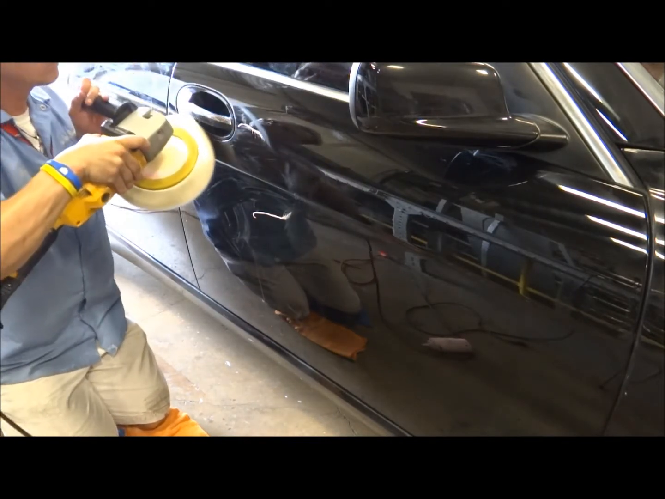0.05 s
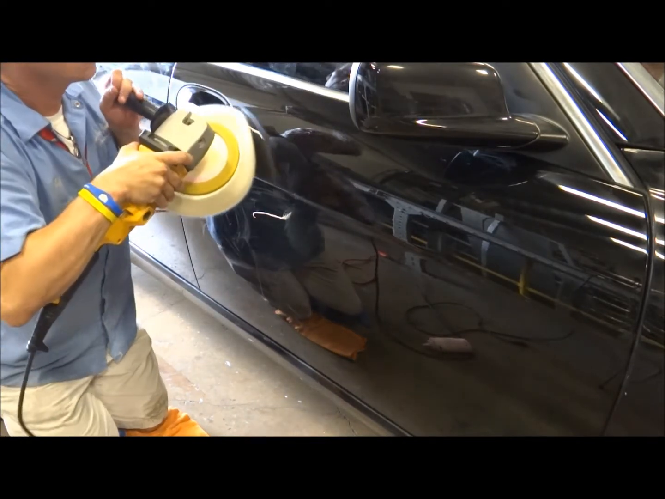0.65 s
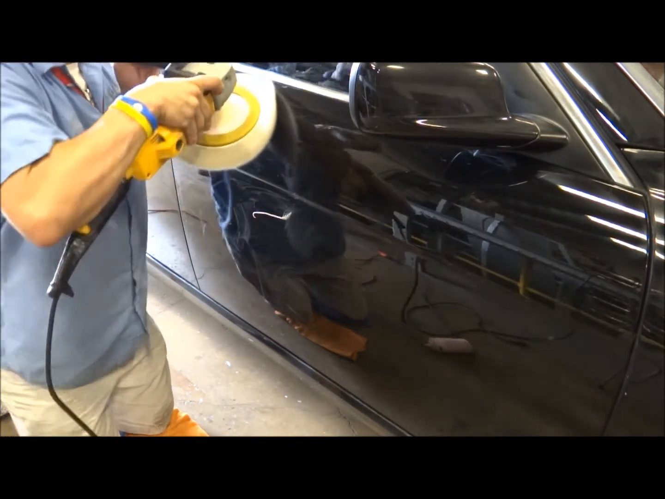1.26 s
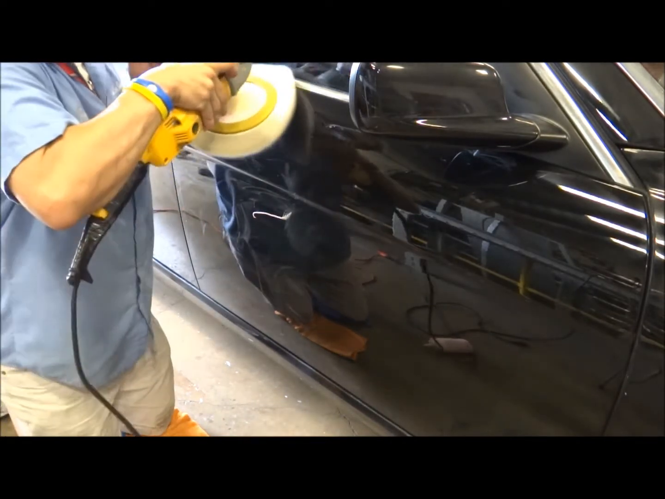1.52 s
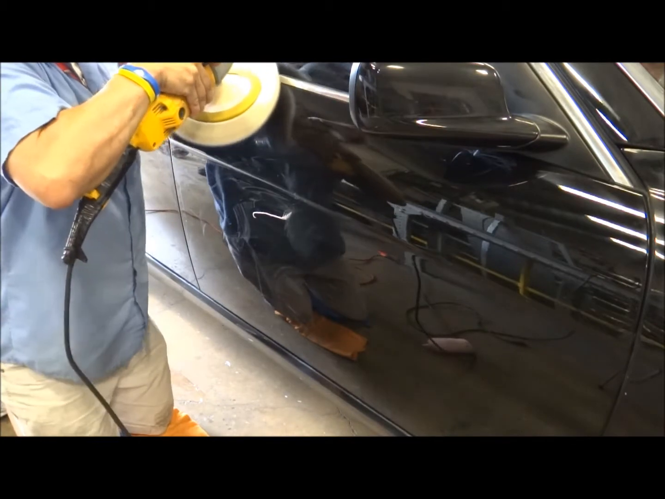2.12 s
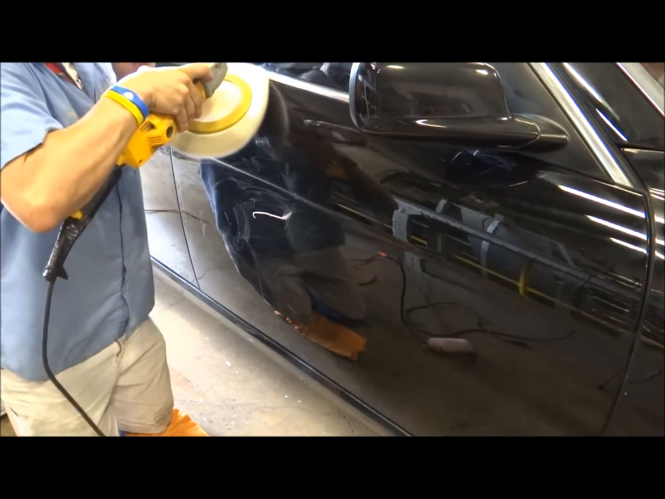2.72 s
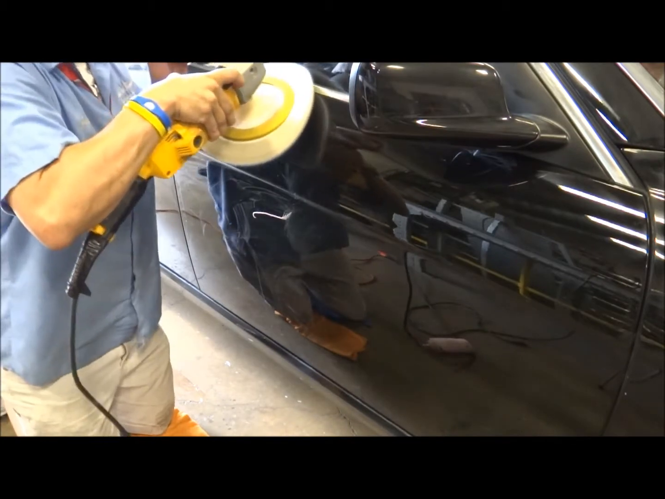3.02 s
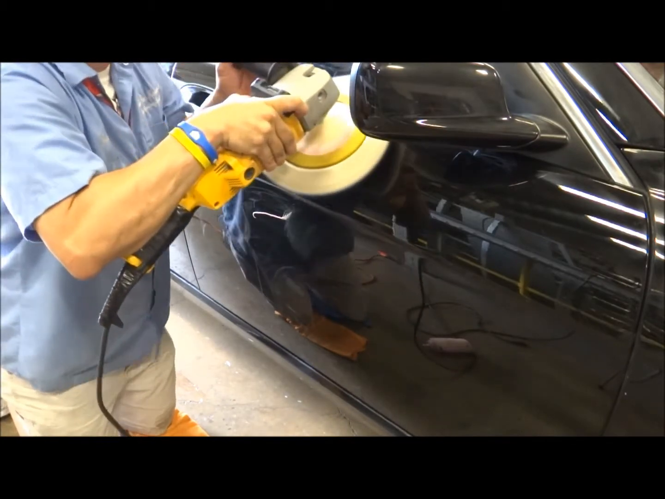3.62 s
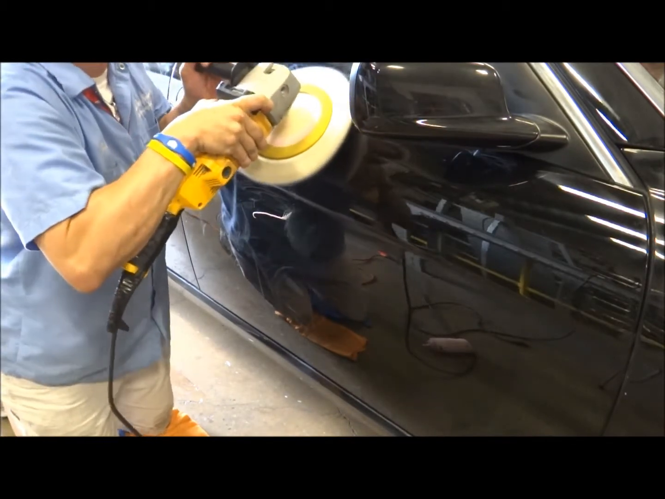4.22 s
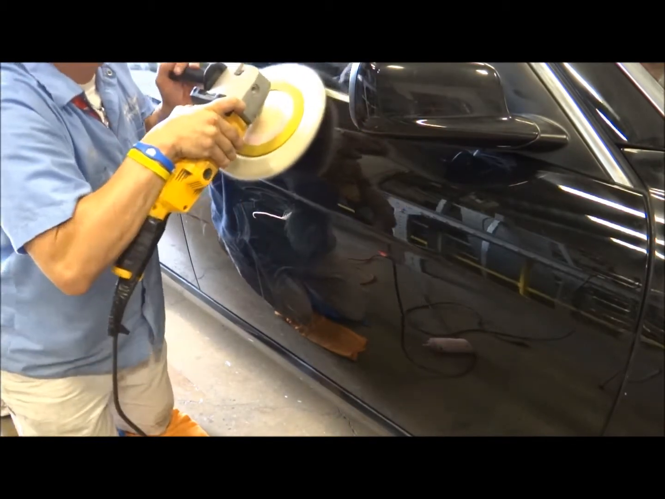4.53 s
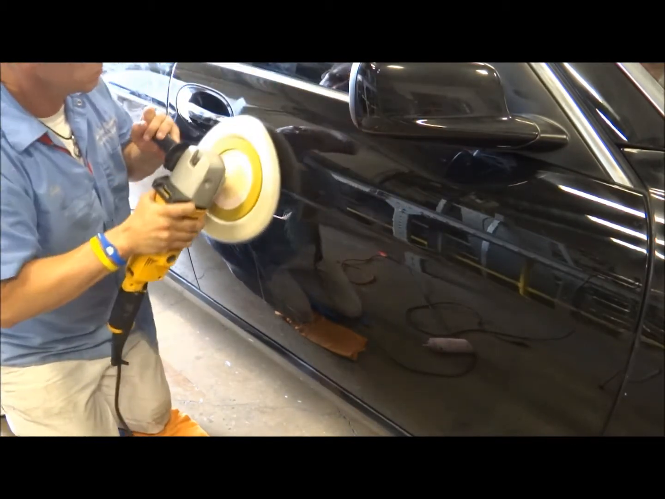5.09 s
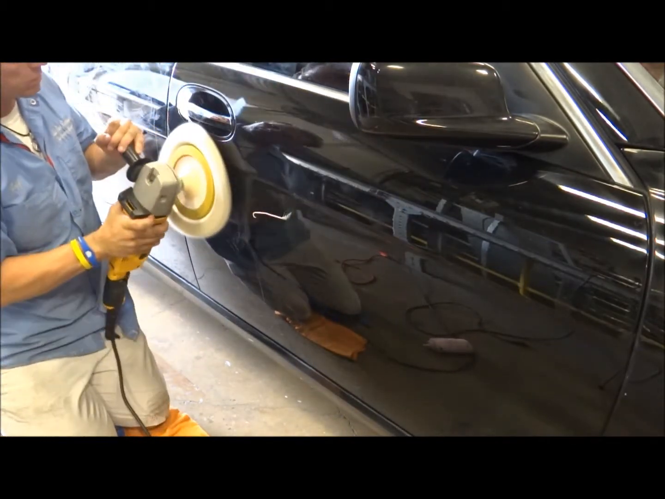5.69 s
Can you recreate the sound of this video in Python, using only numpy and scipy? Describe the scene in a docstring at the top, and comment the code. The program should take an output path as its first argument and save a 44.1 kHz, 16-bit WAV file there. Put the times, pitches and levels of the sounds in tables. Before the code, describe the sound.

A power polisher buffs car paint with a continuous high motor whine, a throbbing gear growl and airy hiss.

```python
"""An electric rotary polisher buffs a car door in a workshop, sagging and recovering as it is pressed on.
The motor whines on high multiples of its rotor speed; the gearbox growls below it and throbs with each
turn of the pad. Cooling air hisses from the vents, the pad rubs and rasps on the paint and sets the
door booming, and the workshop hums faintly behind."""
import sys
import numpy as np
from scipy import signal
from scipy.fft import rfft, irfft
from scipy.io import wavfile
from scipy.ndimage import uniform_filter1d

SR = 44100
rng = np.random.default_rng(int(sys.argv[2]) if len(sys.argv) > 2 else 0)


def store_pcm(level_fs):
    """Save levels as 16-bit WAV."""
    pcm = np.round(np.clip(level_fs, -1, 1) * 32767).astype(np.int16)
    wavfile.write(sys.argv[1], SR, np.atleast_2d(pcm).T)


N = 262395
TIME = np.arange(N) / SR
GEAR_RATIO = 9.11   # rotor turns per turn of the pad


def from_db(db):
    """Decibels to gain."""
    return 10 ** (np.asarray(db) / 20)


def rms_one(x):
    """Scale to unit rms."""
    return x / np.sqrt(np.mean(x ** 2) + 1e-20)


def in_time(points):
    """A curve through (seconds, value) points, at every sample."""
    return np.interp(TIME, *np.transpose(points))


def at_hz(points, hz):
    """Read a curve on a log-frequency axis."""
    f, value = np.transpose(points)
    return np.interp(np.log(np.maximum(hz, 1)), np.log(f), value)


def spell(start, end, edge_s):
    """A gate with soft edges: 1 between two times, 0 outside."""
    return np.clip(np.minimum(TIME - start, end - TIME) / edge_s + .5, 0, 1)


def spells(rows, edge_s):
    """A gain envelope from (start, end, dB) rows."""
    return sum(from_db(db) * spell(start, end, edge_s) for start, end, db in rows)


def drift(rate_hz):
    """Smooth random wander of rms 1."""
    step, settle = 40, 2000
    pole = np.exp(-2 * np.pi * rate_hz * step / SR)
    white = rng.standard_normal(N // step + settle + 2)
    slow = signal.lfilter([1], [1, -2 * pole, pole * pole], white)[settle:]
    return np.interp(np.arange(N) / step, np.arange(len(slow)), rms_one(slow))


def cycle(turns):
    """A sine wave on a count of turns, at a random phase."""
    return np.sin(2 * np.pi * (turns + rng.random()))


def noise(colour):
    """Coloured noise in a narrow stereo image; rms 1."""
    # Stereo width. Each row: frequency in Hz, left-right correlation.
    likeness = [(100, 0.99), (400, 1), (1000, 0.95), (2500, .97), (8000, 0.96), (12000, .999)]
    hz = np.arange(N // 2 + 1) * SR / N
    alike = np.clip(at_hz(likeness, hz), 0, 1)
    mid, side = rfft(rng.standard_normal((2, N))) * from_db(at_hz(colour, hz))
    return rms_one(irfft(np.sqrt(1 + alike) * mid + np.sqrt(1 - alike) * side * [[1], [-1]], N))


def partial(turns, order, fade_db, throb, rough, spread=0.035):
    """One multiple of the rotor speed, shaken by each turn of the pad and by tooth play; rms 1."""
    pad = turns / GEAR_RATIO
    level = from_db(fade_db * drift(5.9)) * (1 + throb * cycle(pad) + rough * drift(33))
    wobble = throb * cycle(pad) + rough * drift(45)
    phase = 2 * np.pi * (order * turns + rng.random()) + wobble
    # reflections off the door differ a little between left and right
    side = spread * drift(2.7) * np.cos(phase + 2 * np.pi * rng.random())
    return rms_one(level * (np.sin(phase) + side * [[1], [-1]]))


def swelling(order):
    """Gain of one partial, which swells while the tool is held at an angle that favours it."""
    # Each row: start and end in seconds, multiple of rotor speed, lift in dB.
    lifts = [(0, 0.505, 24, 2.5), (.5, .8, 50, 11), (1.08, 1.32, 50, 8), (1.102, 1.276, 25, 4),
             (1.15, 3.1, 4, 7.5), (1.35, 1.7, 36, 4), (1.717, 1.957, 24, 5), (1.85, 2.75, 28, 4),
             (2.15, 4.3, 9, 5), (2.25, 2.6, 50, 9), (2.71, 2.984, 23, 10.5), (2.894, 5.05, 30, 5),
             (3.3, 4.4, 49, 8.5), (3.455, 3.85, 6, 4.5), (4.35, 5.003, 24, 6), (4.35, 4.8, 25, 5.5),
             (4.65, 5.285, 6, 6.5), (5.1, 5.5, 36, 7)]
    return from_db(sum(db * spell(start, end, edge_s=0.11) for start, end, k, db in lifts if k == order))


def workshop_hum(rest_db=-81):
    """A bed of low tones that waver and swell."""
    # The tones. Each row: pitch in Hz, relative level in dB.
    hum_tones = [(59, -19), (91.5, -2.5), (118.4, -3.5), (360.7, -6)]
    # Their swells. Each row: start and end in seconds, level in dB.
    hum_swells = [(-.1, .95, -75), (2.45, 3.1, -82), (5.0, 5.85, -74)]
    bed = sum(from_db(db) * rms_one(from_db(2.5 * drift(3.4)) * cycle(hz * TIME + 0.12 * drift(4)))
              for hz, db in hum_tones)
    return (from_db(rest_db) + spells(hum_swells, edge_s=0.12)) * bed


def door_panel(pressure_db, boom_db=-4.0, drum_db=-73.5):
    """The door drums under the pad, and booms at a pitch set by where it is pressed."""
    # The booms. Each row: start and end in seconds, pitch in Hz, relative level in dB.
    panel_booms = [(.04, .22, 198, -61), (.63, 0.803, 195, -62.5), (.78, 1.05, 298, -65),
                   (1.046, 1.75, 185, -71.5), (1.95, 2.08, 198, -66), (2.43, 2.57, 190, -63),
                   (2.553, 2.92, 364, -65), (2.88, 3.15, 230, -60.5), (3.2, 3.6, 210, -66.5),
                   (3.856, 4.3, 203, -64), (5.732, 5.95, 196, -63.5)]
    # The steady drumming. Each row: frequency in Hz, relative level in dB.
    drum_colour = [(100, -31), (165, -11.5), (195, 3.5), (225, -7), (260, -3.5), (400, -36)]
    booms = 0
    for start, end, hz, db in panel_booms:
        tone = rms_one((1 + 0.38 * drift(11)) * cycle(hz * TIME + 0.12 * drift(10)))
        booms += from_db(boom_db + db) * spell(start, end, edge_s=0.12) * tone
    return booms + from_db(drum_db + pressure_db) * noise(drum_colour)


def pad_rub(turns, pressure_db, rub_db=-51.0):
    """The pad rubs unevenly round each turn, and scuffs on its rim when tilted."""
    # Colours of the rub and the scuff. Each row: frequency in Hz, relative level in dB.
    rub_colour = [(20, -21), (55, -10.5), (110, -11), (170, -6), (300, -4.5), (470, -2.5), (660, 1.5),
                  (1000, 1), (1450, 0), (2200, 4), (2800, 0), (3200, 1.5), (4200, -7.5), (7000, -14)]
    scuff_colour = [(200, -29), (380, -0.5), (700, 0), (1000, -11), (1400, -6), (2200, -20)]
    # The rim scuffs. Each row: start and end in seconds, level in dB.
    rim_scuffs = [(4.98, 5.72, -61.5)]
    pad = turns / GEAR_RATIO
    uneven = 1 + 0.1 * cycle(pad) + 0.13 * cycle(2 * pad)
    face = noise(rub_colour) * from_db(rub_db + pressure_db)
    rim = noise(scuff_colour) * spells(rim_scuffs, edge_s=0.11)
    return (face + rim) * uneven * from_db(0.75 * drift(10))


def pad_rasp(turns, grab, rasp_db=2.0):
    """A grabbing pad rasps brightly once a turn."""
    # Colour of the rasp. Each row: frequency in Hz, relative level in dB.
    rasp_colour = [(3500, -40), (5200, -4.5), (5900, 0), (6500, 5), (7300, -3), (8700, 0.5), (11000, -28)]
    pulses = rms_one(np.exp(.7 * cycle(turns / GEAR_RATIO) + 0.31 * drift(31)))
    return from_db(rasp_db) * grab * pulses * noise(rasp_colour)


def vent_air(turns, pressure_db, vent_db=-47.0, chop=0.16):
    """Cooling air hisses from the vents, chopped by the fan and louder under pressure."""
    # Colour of the hiss. Each row: frequency in Hz, relative level in dB.
    vent_colour = [(30, -55), (1500, -17.5), (4200, -11), (5800, -6.5), (6700, -1.5), (7500, -1), (8400, 1),
                   (9300, -2), (10200, -4.5), (11200, -13.5), (12500, -21), (13700, -21), (15500, -25)]
    air = noise(vent_colour) * (1 + chop * cycle(turns))
    return air * from_db(vent_db + 0.78 * pressure_db + 1.2 * drift(9.9))


def gearbox(turns, load_db, growl_db=-63.2, drone_db=-61.5, housing_db=-62):
    """Loaded gears growl and drone, the higher partials throbbing more; the housing rings each pad turn."""
    # The growl. Each row: multiple of rotor speed, relative level in dB.
    gear_partials = [(4, -8), (5, -8.5), (7, 0), (8, -4), (9, -2.5), (10, -3.5), (11, -2), (12, 0),
                     (13, -9), (14, -7.5), (16, -6.5), (18, -5.5), (19, -5.5)]
    # The housing's ring. Each row: frequency in Hz, relative level in dB.
    housing_colour = [(2500, -41), (2950, -14), (3080, -0.5), (3200, -4), (3400, -14), (3900, -40)]
    growl = 0
    for order, db in gear_partials:
        tone = partial(turns, order, fade_db=1.7, throb=min(0.048 * order, .6), rough=0.11)
        growl += from_db(db) * swelling(order) * tone
    drone = swelling(order=6) * partial(turns, order=6, fade_db=1.8, throb=0.27, rough=0.076)
    housing = noise(housing_colour) * rms_one(np.exp(.7 * cycle(turns / GEAR_RATIO)))
    return (from_db(growl_db + load_db) * growl
            + from_db(drone_db + 0.35 * load_db) * drone
            + from_db(housing_db + 0.75 * load_db) * housing)


def motor(turns, reach, whine_db=0.28, bearing_db=-60, bearing_order=24.67, pole_db=-65.0):
    """Commutator and fan partials whine, each beamed its own way; a bearing sings and two poles hum."""
    # The whine. Each row: multiple of rotor speed, relative level in dB at half reach,
    # dB gained from no reach to full reach.
    whine_partials = [(20, -68, 3), (21, -66, -1), (22, -69, 0), (23, -57.5, 1.5), (24, -50.5, -4.5),
                      (25, -50.5, -1.5), (26, -55.5, 4.5), (27, -59, 4), (28, -59, 4.5), (29, -58.5, 5),
                      (30, -53, 5), (31, -57, 7), (32, -56, 6), (33, -61.5, -10), (35, -72, -4),
                      (36, -61, 4), (47, -78, 6), (48, -75, 8), (49, -72.5, 2), (50, -71, 2), (51, -78, 0)]
    whine = 0
    for order, db, reach_db in whine_partials:
        tone = partial(turns, order, fade_db=2.27, throb=0.14, rough=0.17)
        whine += from_db(whine_db + db + reach_db * (reach - .5)) * swelling(order) * tone
    bearing = rms_one(from_db(5.1 * drift(2.2)) * cycle(bearing_order * turns))
    poles = partial(turns, order=2, fade_db=1.6, throb=0.1, rough=0.17)
    return whine + from_db(bearing_db) * bearing + from_db(pole_db + 9 * (reach - .5)) * poles


def scene(jitter_hz=0.1033, judder_hz=0.477, ripple_hz=1.1, mains_hz=60):
    """Speed, reach and pressure drive the polisher, a little left of centre, over the door and the hum."""
    # Motor speed. Each row: time in seconds, rotor turns per second.
    rotor_speed = [(0.0, 275.5), (0.3, 273.5), (0.45, 276.9), (0.69, 271.0), (0.74, 271.7), (0.89, 280.4),
                   (1.01, 278.3), (1.28, 281.7), (1.42, 277.8), (1.77, 278.7), (1.87, 276.5), (2.07, 277.7),
                   (2.17, 276.2), (2.4, 278.3), (2.72, 276.4), (2.78, 274.6), (3.18, 277.0), (4.11, 274.7),
                   (4.64, 279.2), (5.12, 277.1), (5.4, 278.1), (5.58, 274.3), (5.75, 274.4), (5.95, 277.0)]
    # The tool is pushed up the door and drawn back. Each row: time in seconds, reach from 0 to 1.
    arm_reach = [(0, 0), (.6, 0.17), (1.5, 0.6), (3.0, 0.89), (4.2, 1), (4.8, 0.64), (5.4, .1), (5.95, 0)]
    # How hard the pad bears on the paint. Each row: time in seconds, friction in dB against normal.
    pad_pressure = [(0, -0.5), (.2, -1.4), (.62, 1.5), (.85, -1), (1.26, 0.5), (1.8, -2), (2.15, 1.4),
                    (2.42, -.4), (2.68, 1.5), (3.2, -0.2), (3.6, 2), (4.22, 2.2), (4.6, -3), (4.85, -2.5),
                    (5.06, -1.5), (5.38, 0.5), (5.6, -1.1), (5.95, -2.5)]
    # The operator leans in and the gears labour. Each row: start and end in seconds, lift in dB.
    leans = [(.2, .8, 4.5), (3.38, 4.252, 4.5), (4.75, 5.298, 4.0)]
    # The pad grabs the paint. Each row: start and end in seconds, relative rasp level in dB.
    pad_grabs = [(0.241, .44, -53.5), (0.477, .60, -56), (0.767, 1.121, -51.5), (1.119, 1.312, -50),
                 (1.548, 1.722, -56.5), (1.946, 2.552, -58), (2.773, 2.924, -53), (5.252, 5.43, -59.5)]
    rotor_hz, reach, pressure_db = in_time(rotor_speed), in_time(arm_reach), in_time(pad_pressure)
    grab = spells(pad_grabs, edge_s=0.032)
    # the gears growl more as the load drags the rotor down
    sag_hz = rotor_hz.mean() - rotor_hz
    lean_db = sum(db * spell(start, end, edge_s=0.16) for start, end, db in leans)
    load_db = 0.6 * pressure_db + 0.21 * sag_hz + lean_db
    # a grabbing pad shakes the speed, and the torque pulses twice per mains cycle
    shake = (jitter_hz + judder_hz * grab / grab.max()) * drift(14.1)
    ripple = ripple_hz * cycle(2 * mains_hz * TIME)
    turns = np.cumsum(rotor_hz + shake + ripple) / SR
    tool = motor(turns, reach) + gearbox(turns, load_db) + vent_air(turns, pressure_db)
    tool += pad_rub(turns, pressure_db) + pad_rasp(turns, grab)
    left_db = 1.47 - 1.7 * reach   # left minus right: near the centre at full reach
    return tool * from_db(left_db * np.array([[.5], [-.5]])) + door_panel(pressure_db) + workshop_hum()


def record(dry, target_db=-40.5, strength=0.51, window_s=0.037, cutoff_hz=15650):
    """Fast gain control draws the level about halfway to a target; a steep low-pass cuts the top."""
    power = uniform_filter1d(np.mean(dry ** 2, axis=0), int(window_s * SR))
    levelled = dry * from_db(strength * (target_db - 10 * np.log10(power)))
    return signal.sosfilt(signal.ellip(12, .2, 80, cutoff_hz, fs=SR, output="sos"), levelled)


dry = scene()
out = record(dry)
store_pcm(out)
```